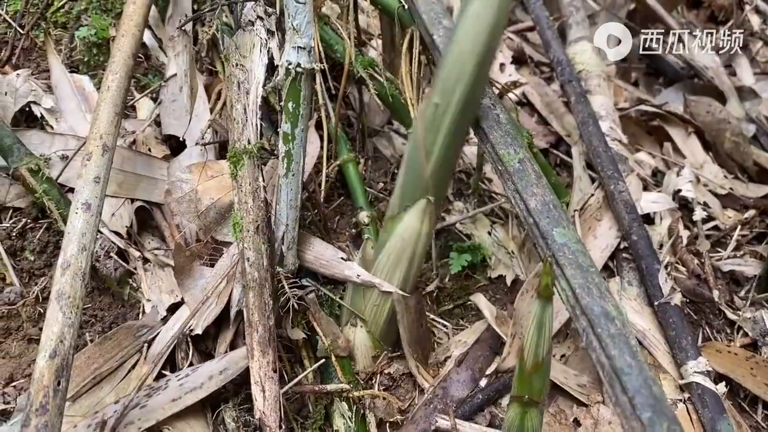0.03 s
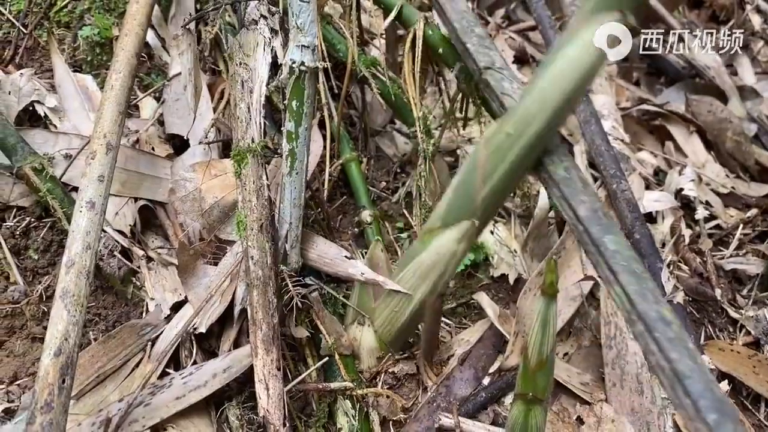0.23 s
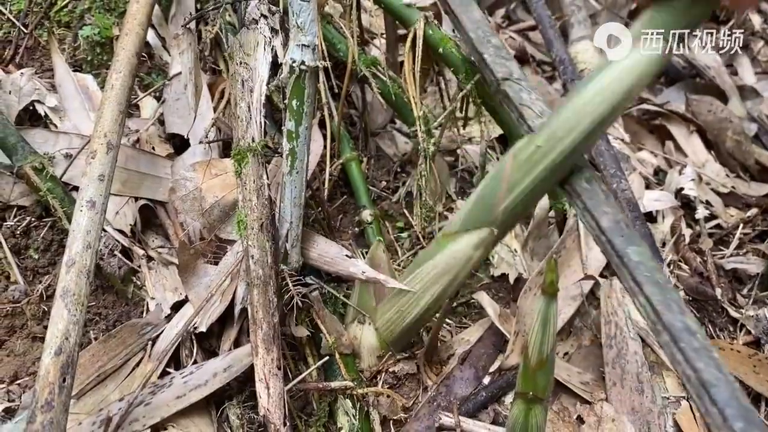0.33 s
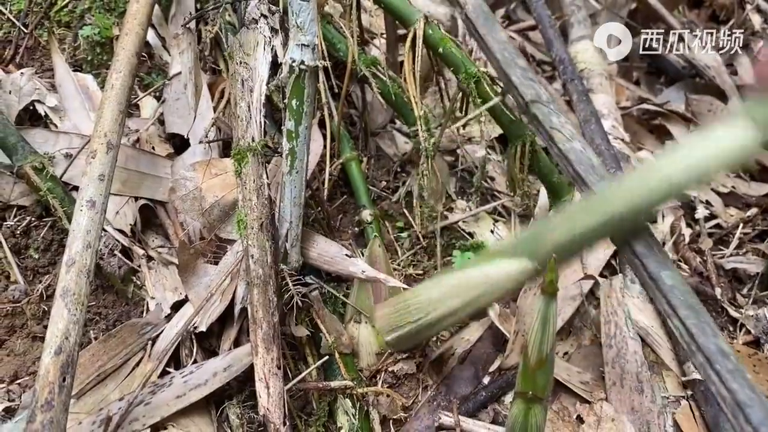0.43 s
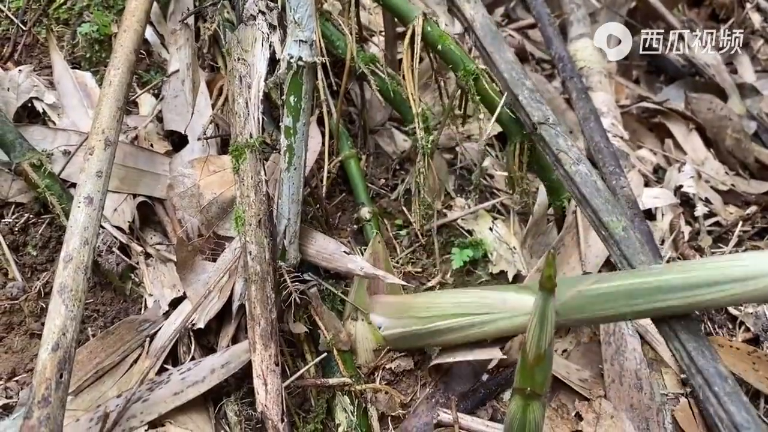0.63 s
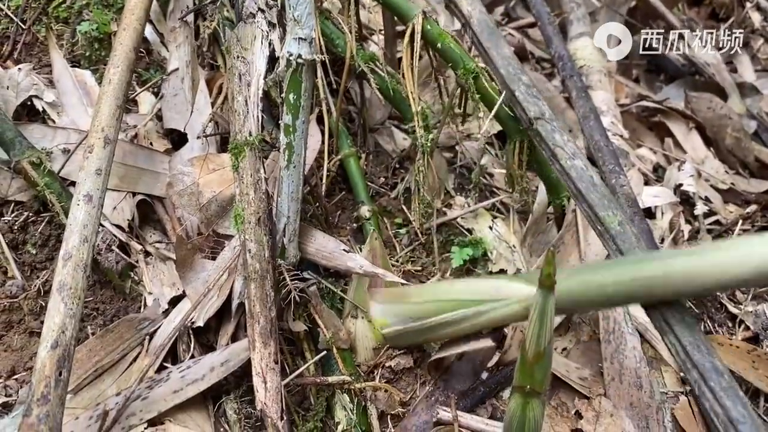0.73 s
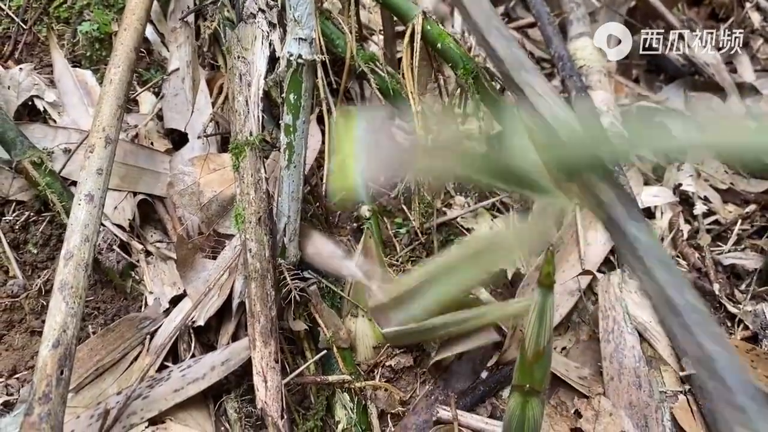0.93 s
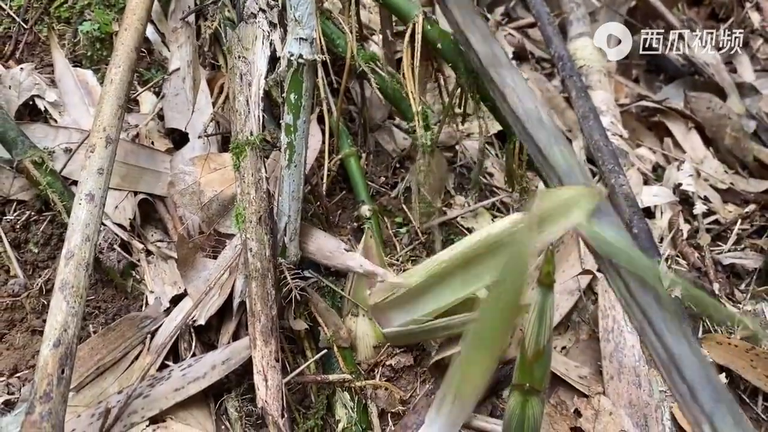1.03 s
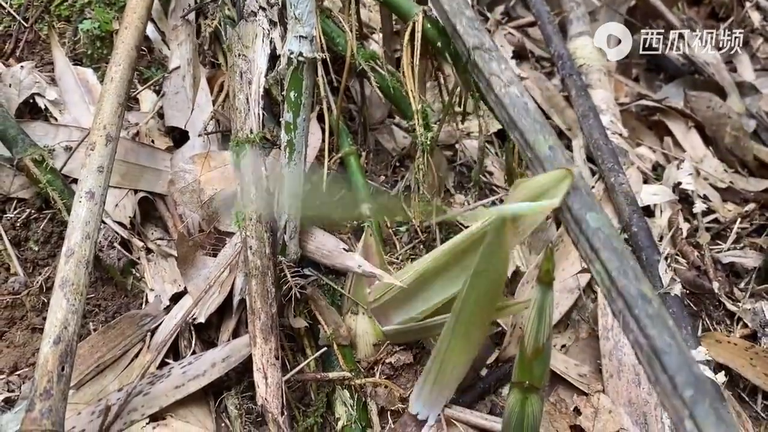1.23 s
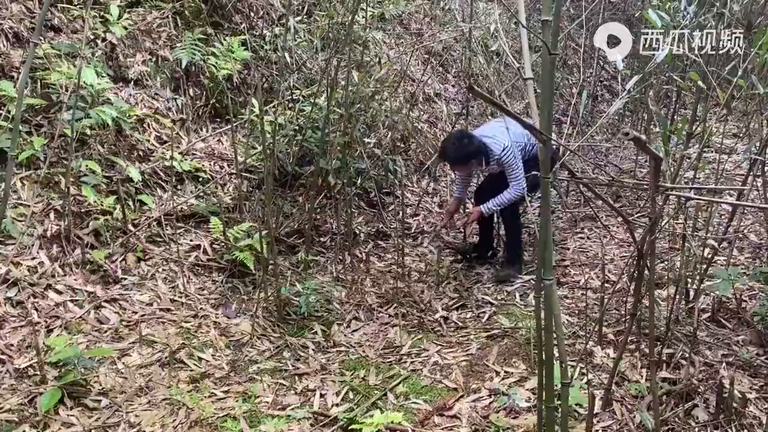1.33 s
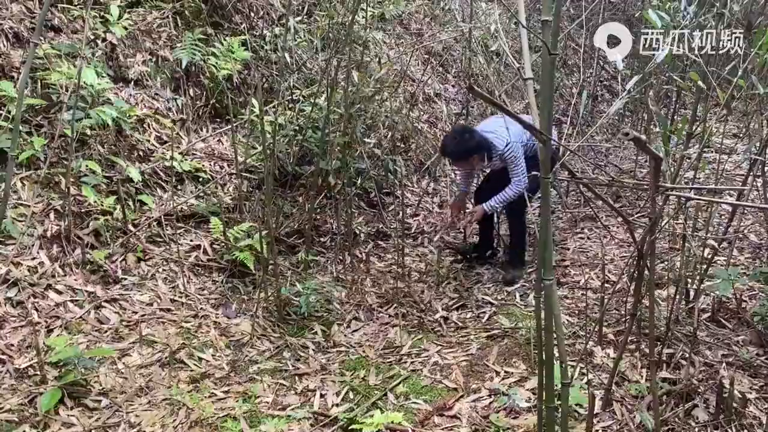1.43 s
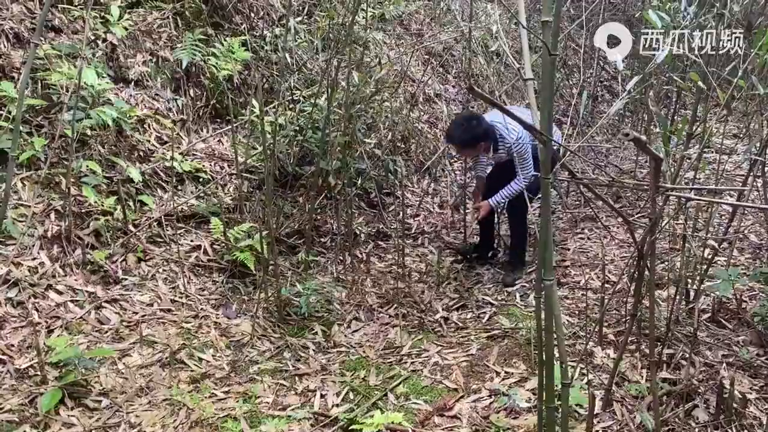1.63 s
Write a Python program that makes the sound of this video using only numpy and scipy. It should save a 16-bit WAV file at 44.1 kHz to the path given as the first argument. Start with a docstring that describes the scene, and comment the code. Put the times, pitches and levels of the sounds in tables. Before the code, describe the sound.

Sharp, bright cracks come from a bamboo shoot being bent nearby, building into dense splintering with short rips of the husk. Dry leaves on the ground crackle along with it, leaving only faint rustling in the quiet outdoor air.

```python
"""Bamboo shoot breaking

A fresh shoot is bent over close by: its fibres crack one by one, then in a splintering run, and the
husk rips off. Each crack is a bright snap that rings the damp stalk for a few milliseconds. Dry leaves
rustle and crackle over a low rumble; after a brief dip in level only faint rustling is left."""
import sys
import numpy as np
from scipy import signal
from scipy.fft import rfft, irfft, next_fast_len
from scipy.io import wavfile
from scipy.ndimage import uniform_filter1d, minimum_filter1d

SR = 44100
rng = np.random.default_rng(int(sys.argv[2]) if len(sys.argv) > 2 else 0)


def to_wav(s):
    """Save 16-bit WAV."""
    ch = np.atleast_2d(s).T  # columns
    pcm = np.round(np.clip(ch, -1, 1) * 32767)  # PCM
    wavfile.write(sys.argv[1], SR, pcm.astype(np.int16))


N = 74970
T = np.arange(N) / SR

# fibre cracks: start_s, level_db, tear_ms, pitch_hz, thud_db, hollow_db, edge_db (last three re snap)
CRACKS = [(0.208, -8.5, 0.45, 2420, -15, -2.5, 9), (0.227, -8, 0.074, 2930, -16.5, -8.5, 4.5),
          (0.2291, -16.5, 2.55, 3440, -35, -14, 0.5), (0.289, -5, 0.1, 4630, -25, -16.5, -8),
          (0.296, -16.5, 0.095, 4260, -32.5, -8.5, 4.5), (0.328, -13, 0.11, 4230, -31, -12, -3.5),
          (0.3701, -21.5, 0.5, 3980, -35, -23.5, 3.5), (0.3868, -4.5, 2.75, 4140, -11.5, -4.5, 3),
          (0.4058, -14.5, 0.34, 4630, -20, -34, -2), (0.415, -5.5, 2.72, 4430, -15.5, -14, 0),
          (0.4172, -10, 3.4, 3230, -15.5, -7, -3), (0.4265, -15.5, 0.103, 5040, -18, -7, 2),
          (0.4334, -17.5, 0.8, 5200, -31, 2, 3), (0.4662, -17, 1.65, 3640, -29, -6, -3.5),
          (0.4802, -7.5, 0.084, 5630, -22.5, -3.5, 7.5), (0.5195, -18.5, 0.094, 5800, -35, -8.5, 11.5),
          (0.5696, -16, 0.5, 3580, -42, -12.5, -2), (0.5954, -8, 0.28, 4170, -17.5, -0.5, 2.5),
          (0.614, -5.5, 3.41, 3154, -16.5, -2, 3.5), (0.6535, -17.5, 0.58, 4830, -27, -19, -2),
          (0.6674, -13.0, 1.17, 2380, -24.5, -3, -1.5), (0.6848, -7, 0.102, 4140, -39, -18, -0.5),
          (0.697, -10.5, 2.52, 3040, -26.5, -16, -4.5), (0.715, -1, 0.1, 3090, -29, -18.5, 4.5),
          (0.718, -6.5, 2.5, 3150, -47, -16.5, -1), (0.7226, -7, 1.26, 3070, -25, -14, -3.5),
          (0.7247, -4.5, 3.15, 3010, -26.5, -10.5, 0), (0.7303, -14, 0.67, 2976, -32.5, -6.5, -3),
          (0.7519, -11, 1.13, 2870, -25.5, -10, -1.5), (0.755, -5, 2.01, 3056, -19.5, -8, -2),
          (0.7703, -10, 1.56, 3840, -12.5, -5.5, 1), (0.7784, -8, 0.54, 4200, -15, -1, -11),
          (0.792, -7.5, 1.7, 5730, -9.5, 5, 8.5), (0.797, -9.5, 4.96, 2890, -9.5, -8.5, 4),
          (0.8177, -9.5, 1.28, 3150, -29, -7.5, 0), (0.8263, -8.5, 0.186, 3330, -20.5, -9.5, -0.5),
          (0.8329, -11.5, 1.02, 3270, -40.5, -9, 1.5), (0.8354, -17, 0.75, 3450, -33, -11.5, 3),
          (0.8885, -5.5, 1.13, 3720, -14.5, -0.5, 2.5), (0.8899, -8.5, 1.86, 3720, -14.5, -7.5, -1),
          (0.9115, -7.5, 2.34, 3860, -50.5, -10, -1), (0.9352, -9.5, 1.56, 4960, -19.5, -10.5, -1.5),
          (0.9461, -10, 3.3, 3620, -21, -17, 0.5), (0.9593, -8, 0.61, 3870, -22.5, -8.5, -5)]
# leaf rustle envelope: time_s, level_db
RUSTLE = [(0, -52), (.105, -49.5), (.165, -50.5), (.35, -48.5), (.43, -37), (.53, -47), (.64, -47),
          (.8, -37.5), (.855, -38.5), (.955, -35.5), (.992, -37.5), (1.035, -45), (1.07, -39.5),
          (1.115, -50), (1.32, -49.5), (1.41, -46.5), (1.5, -55.5), (1.7, -57.5)]
# spectrum of a dry tick: pitch_ratio, gain_db
TICK_SHAPE = [(.06, -21), (.2, -10.5), (.7, -2), (1, 1.5), (1.3, -0.5), (3, -7.5)]


def amp(db):
    """Decibels to gain."""
    return 10 ** (np.asarray(db) / 20)


def unit(x):
    """Scale to rms 1."""
    return x / np.sqrt(np.mean(x ** 2) + 1e-20)


def level(rows):
    """Gain per sample from (time_s, level_db) points."""
    return amp(np.interp(T, *np.transpose(rows)))


def tuned(shape, pitch_hz):
    """Place a (pitch_ratio, gain_db) shape on a pitch."""
    return [(ratio * pitch_hz, db) for ratio, db in shape]


def colour(x, points, size=4096):
    """Minimum-phase filter through (freq_hz, gain_db) points."""
    hz, db = np.transpose(points)
    bins_hz = np.fft.rfftfreq(size, 1 / SR)
    gain_db = np.interp(np.log(bins_hz + 1), np.log(hz), db)
    cepstrum = irfft(np.log(amp(gain_db)))
    cepstrum[1:size // 2] *= 2
    cepstrum[size // 2 + 1:] = 0
    response = irfft(np.exp(rfft(cepstrum)))
    return signal.fftconvolve(x, response)[:len(x)]


def add(out, start_s, x):
    """Mix x into out."""
    i = round(start_s * SR)
    out[i:i + len(x)] += x[:max(N - i, 0)]


def grains(rate_hz, spread_db):
    """Random tiny fractures of uneven size, rms 1."""
    size = amp(spread_db * np.minimum(rng.exponential(size=N), 3))
    fires = rng.random(N) < rate_hz / SR
    return unit(fires * size * rng.choice([-1, 1], N))


def patchy(x, depth_db, size=512):
    """Passing resonances: patches of random gain in time and frequency."""
    spectra = signal.stft(x, nperseg=size)[2]
    field = uniform_filter1d(rng.standard_normal(spectra.shape), size=9, axis=0)
    field = uniform_filter1d(field, size=6, axis=1)
    return signal.istft(spectra * amp(depth_db * unit(field)), nperseg=size)[1][:N]


def burst(t, tear_s, spectrum, lag_s=0, stretch=1, kick_db=0):
    """One band of a fracture: release, tearing and after-ring, with the energy of 1 ms at rms 1."""
    snap_t60_s, ring_t60_s = 0.00378 * stretch, 0.0096 * stretch
    age_s = np.maximum(t - lag_s, 0)
    since_tear_s = np.maximum(age_s - tear_s, 0)
    release = amp(-60 * age_s / snap_t60_s)
    tearing = amp(-19.5 - 60 * since_tear_s / snap_t60_s)
    ring = amp(-9 - 60 * since_tear_s / ring_t60_s)
    envelope = (t >= lag_s) * np.sqrt(release ** 2 + tearing ** 2 + ring ** 2)
    force = envelope * rng.choice([-1, 1], len(t))
    force[round(lag_s * SR)] *= amp(kick_db)
    band = colour(force, spectrum, size=1024)
    return band / np.linalg.norm(band) * np.sqrt(SR / 1000)


def cracks(echo_s=0.0014, echo_db=-16.5):
    """Fibres break and echo once along the stalk; lower bands travel slower and arrive later."""
    # spectra of low thud, hollow ring and bright edge: freq_hz, gain_db
    thud = [(90, -50.5), (280, -2.5), (560, 0.5), (720, -5.5), (1100, -8.5), (2000, -66.5)]
    hollow = [(400, -31.5), (650, -17), (900, -7.5), (1490, 1), (1850, -4), (2150, -9), (3200, -22.5)]
    edge = [(3000, -25.5), (5200, -4), (6000, 1), (7800, 4.5), (9500, 1.5), (12000, 3.5), (14500, -1),
            (16000, -7)]
    # snap spectrum: pitch_ratio, gain_db
    snap = [(.35, -50), (.55, -6), (.68, -2.5), (.83, 2.5), (1, 1.5), (1.15, -1), (1.35, -0.5), (1.7, -8),
            (2.8, -28)]
    out, t = np.zeros(N), np.arange(1500) / SR
    for start_s, level_db, tear_ms, pitch_hz, thud_db, hollow_db, edge_db in CRACKS:
        tear_s = tear_ms / 1000
        bands = np.array([burst(t, tear_s, thud, lag_s=0.0012, stretch=0.73, kick_db=20.5),
                          burst(t, tear_s, hollow, lag_s=0.0006, stretch=1.38, kick_db=15),
                          burst(t, tear_s, tuned(snap, pitch_hz), stretch=0.72, kick_db=6.5),
                          burst(t, tear_s, edge, stretch=0.887, kick_db=8.5)])
        share = amp([thud_db, hollow_db, 0, edge_db])
        crack = amp(level_db) * (share / np.linalg.norm(share)) @ bands
        add(out, start_s, crack)
        delay_s = echo_s * np.exp(rng.standard_normal() / 10)
        add(out, start_s + delay_s, amp(echo_db) * crack)
    return out


def wall_rings(t60_s=0.01148, attack_s=0.0006):
    """Strips of stalk wall spring free at strong cracks and ring, each at its own pitch."""
    # ringing strips: start_s, pitch_hz, level_db
    strips = [(0.2082, 3284, -13.5), (0.2272, 2364, -9), (0.2894, 1446, -12), (0.328, 3396, -13),
              (0.4165, 3078, -2), (0.5956, 1805, -10), (0.6148, 890, -13), (0.6152, 1539, -6),
              (0.725, 2703, 0), (0.8885, 3947, -2), (0.8889, 930, -9.5), (0.8895, 556.5, -9.5)]
    out, t = np.zeros(N), np.arange(1500) / SR
    for start_s, pitch_hz, level_db in strips:
        envelope = amp(level_db - 60 * t / t60_s) * (1 - np.exp(-t / attack_s))
        add(out, start_s, envelope * np.sin(2 * np.pi * pitch_hz * t))
    return out


def husk_rips(ramp_s=0.0066):
    """The husk peels in short runs of dense fibre breaks."""
    # peeling runs: start_s, length_s, level_db
    runs = [(0.779, 0.03007, -22.5), (0.865, 0.0321, -25.5), (0.936, 0.01693, -20), (0.954, 0.01197, -24)]
    # husk spectrum: freq_hz, gain_db
    husk = [(100, -37.5), (400, -9), (1400, 1.5), (2100, -5), (3200, 2), (15000, -11.5)]
    gain = np.zeros(N)
    for start_s, length_s, level_db in runs:
        inside_s = np.minimum(T - start_s, start_s + length_s - T)
        gain += amp(level_db) * np.clip(inside_s / ramp_s + 0.5, 0, 1)
    return gain * unit(colour(grains(rate_hz=3000, spread_db=0.5), husk))


def soil_bump(start_s=0.3875, peak_db=-28.5):
    """The stalk shifts in the soil: a dull, quickly damped knock."""
    # knock spectrum: freq_hz, gain_db
    spectrum = [(50, -49), (140, 3), (260, 6.5), (1200, -44)]
    out = np.zeros(N)
    knock = colour(signal.unit_impulse(SR // 10), spectrum)
    add(out, start_s, amp(peak_db) * knock / np.abs(knock).max())
    return out


def ticks():
    """Faint fibre cracks as the shoot bends, then small dry leaf ticks."""
    # faint cracks and leaf ticks: start_s, level_db, pitch_hz
    events = [(0.0922, -30, 8160), (0.1038, -32, 7700), (0.1131, -28.5, 6370), (0.2649, -27, 6140),
              (0.325, -21, 6500), (0.4511, -18.5, 3780), (0.4575, -20, 4200), (0.7493, -20.5, 4600),
              (0.8229, -17, 3600), (1.002, -28.5, 6500), (1.0237, -28, 9500), (1.042, -31, 7500),
              (1.0525, -26, 6160), (1.0672, -26, 1530), (1.2762, -29, 6500), (1.3539, -38.5, 3500),
              (1.531, -38, 4800)]
    out, t = np.zeros(N), np.arange(1500) / SR
    for start_s, level_db, pitch_hz in events:
        add(out, start_s, amp(level_db) * burst(t, tear_s=0, spectrum=tuned(TICK_SHAPE, pitch_hz)))
    return out


def strain(end_s=0.96, t60_s=0.0055, over_rustle_db=0.5):
    """Sparse, tiny fibre fractures while the stalk is bent."""
    t = np.arange(SR // 100) / SR
    fractures = np.abs(grains(rate_hz=80, spread_db=3))
    envelope = signal.fftconvolve(fractures, amp(-60 * t / t60_s))[:N]
    crackle = unit(colour(envelope * rng.standard_normal(N), tuned(TICK_SHAPE, pitch_hz=6390)))
    return amp(over_rustle_db) * level(RUSTLE) * (T < end_s) * crackle


def leaves(crackle_db=-3, crackle_t60_s=0.007):
    """Dry leaves slide over each other, with fine crackle and shifting colour."""
    # leaf spectrum: freq_hz, gain_db
    spectrum = [(100, -7), (400, -1), (1600, 2.5), (7000, 3), (15000, 2), (16000, -14.5)]
    t = np.arange(SR // 50) / SR
    fractures = np.abs(grains(rate_hz=240, spread_db=3.6))
    envelope = signal.fftconvolve(fractures, amp(-60 * t / crackle_t60_s))[:N]
    crackle = amp(crackle_db) * unit(envelope * rng.standard_normal(N))
    sliding = grains(rate_hz=9600, spread_db=6)
    rustle = patchy(crackle + sliding, depth_db=2.8)
    return level(RUSTLE) * unit(colour(rustle, spectrum))


def sheath_brushes():
    """The loose sheath brushes past leaves in soft swishes."""
    # swishes: centre_s, sigma_s, level_db
    swishes = [(1.161, 0.00756, -42.5), (1.303, 0.00493, -38)]
    gain = sum(amp(level_db) * np.exp(-((T - centre_s) / sigma_s) ** 2 / 2)
               for centre_s, sigma_s, level_db in swishes)
    return gain * unit(colour(rng.standard_normal(N), tuned(TICK_SHAPE, pitch_hz=6390)))


def scatter(x, t60_s=0.0663, gain_db=-21, gap_s=0.002):
    """Faint, short reflections from ground and neighbouring canes."""
    t = np.arange(SR // 4) / SR
    tail = rng.standard_normal(len(t)) * amp(-60 * t / t60_s) * (t > gap_s)
    return amp(gain_db) * signal.fftconvolve(x, tail / np.linalg.norm(tail))[:N]


def rumble():
    """A deep hum fades into a slightly higher rumble."""
    # rumble envelope: time_s, level_db
    envelope = [(0, -55), (.6, -57), (.8, -53.5), (1.315, -48.5), (1.34, -64), (1.7, -68)]
    # hum and rumble spectra: freq_hz, gain_db
    deep_spectrum = [(30, -55.5), (72, -4), (130, -7.5), (900, -48)]
    higher_spectrum = [(25, -37.5), (72, -2), (140, -1), (230, -6), (400, -25.5), (2000, -39)]
    deep = unit(colour(rng.standard_normal(N), deep_spectrum))
    higher = unit(colour(rng.standard_normal(N), higher_spectrum))
    last_crack_s = CRACKS[-1][0]
    fade_rad = np.pi / 2 * np.clip(T / last_crack_s, 0, 1) ** 2
    return level(envelope) * (np.cos(fade_rad) * deep + np.sin(fade_rad) * higher)


def grove_air(level_db=-63):
    """Quiet, steady air of the grove."""
    # air spectrum: freq_hz, gain_db
    spectrum = [(30, -6), (70, 10), (350, 13.5), (1500, -0.5), (15000, -41.5)]
    return amp(level_db) * unit(colour(rng.standard_normal(N), spectrum))


def scene():
    """The breaking shoot among the leaves, mono."""
    shoot = cracks() + wall_rings() + husk_rips() + soil_bump() + ticks()
    mix = shoot + scatter(shoot) + strain() + leaves() + sheath_brushes()
    return (mix + rumble() + grove_air())[None]


def record(dry, ceiling=1.022, window_samples=45, dip_s=(1.328, 1.338), dip_db=-29, top_hz=15900):
    """A fast limiter holds the peaks, the level dips briefly, and the band ends steeply."""
    needed_gain = np.minimum(1, ceiling / (np.abs(dry) + 1e-9))
    limited = dry * uniform_filter1d(minimum_filter1d(needed_gain, window_samples), window_samples)
    dipped = limited * np.where((T > dip_s[0]) & (T < dip_s[1]), amp(dip_db), 1)
    size = next_fast_len(N + SR // 10)
    lowpass = 1 / np.sqrt(1 + (np.fft.rfftfreq(size, 1 / SR) / top_hz) ** 200)
    return irfft(rfft(dipped, size) * lowpass, size)[:, :N]


dry = scene()
out = record(dry)
to_wav(out)
```